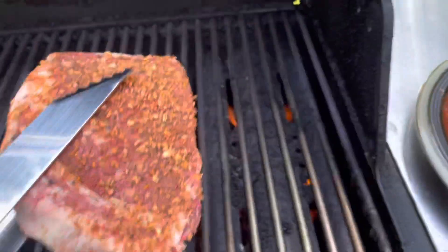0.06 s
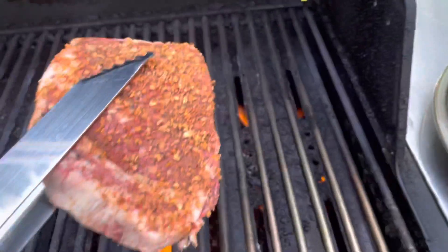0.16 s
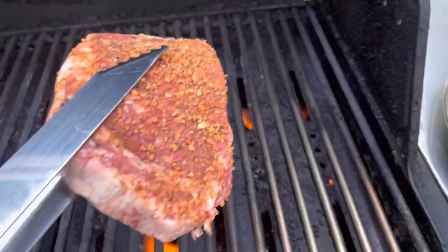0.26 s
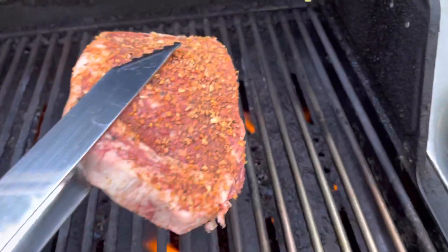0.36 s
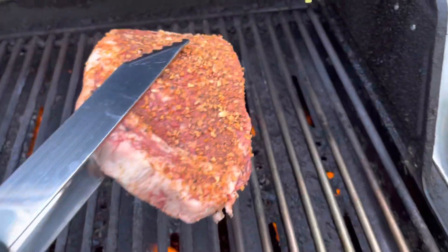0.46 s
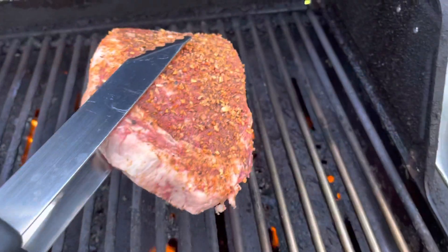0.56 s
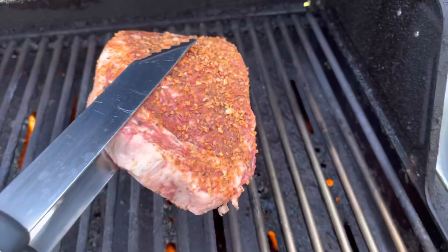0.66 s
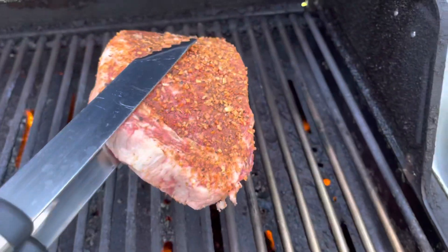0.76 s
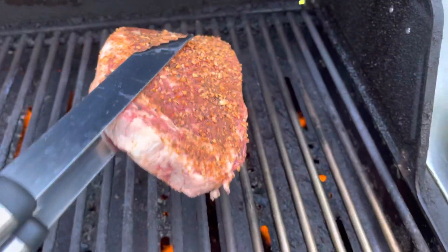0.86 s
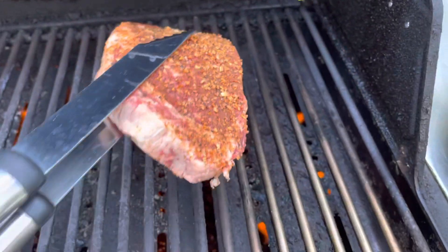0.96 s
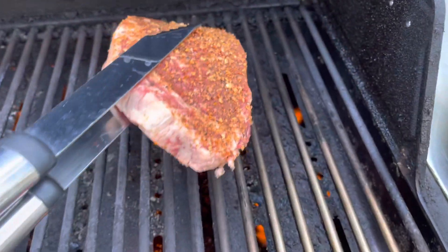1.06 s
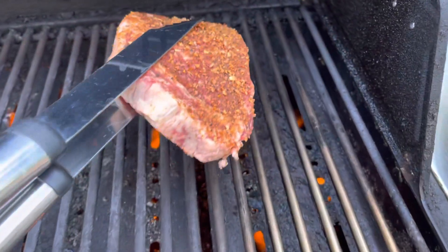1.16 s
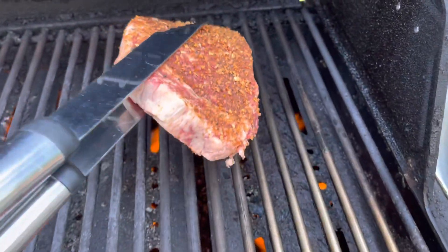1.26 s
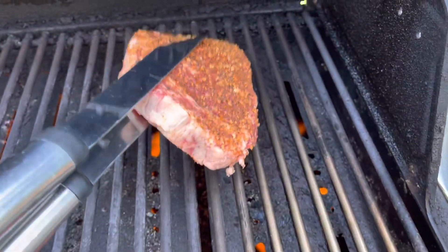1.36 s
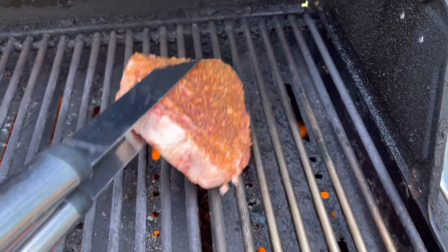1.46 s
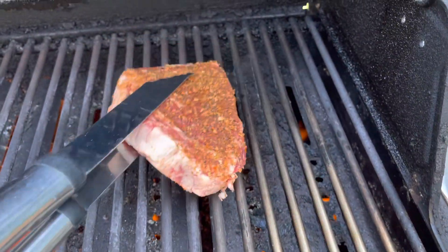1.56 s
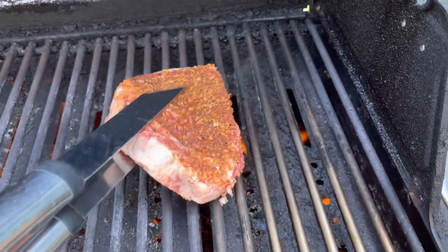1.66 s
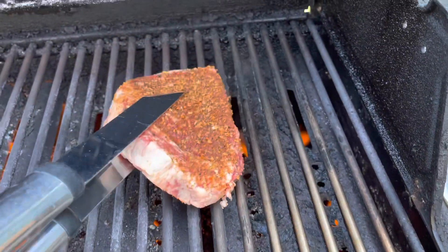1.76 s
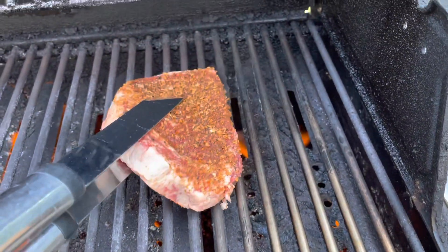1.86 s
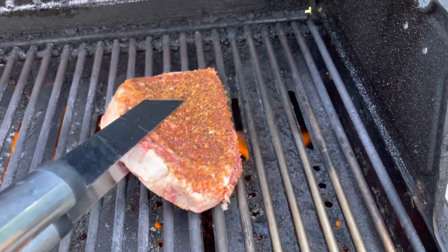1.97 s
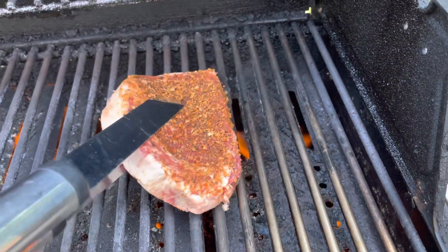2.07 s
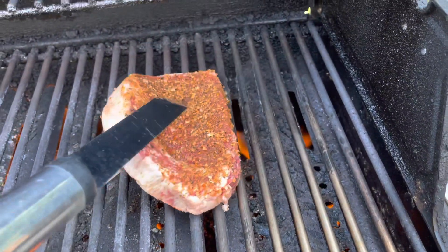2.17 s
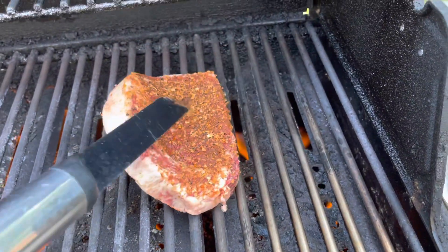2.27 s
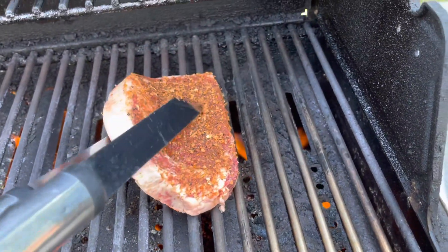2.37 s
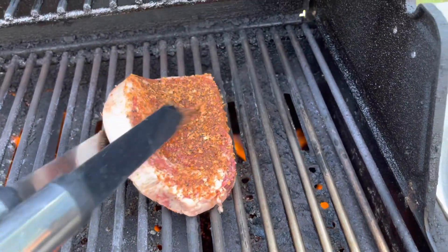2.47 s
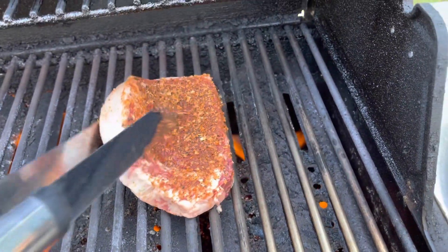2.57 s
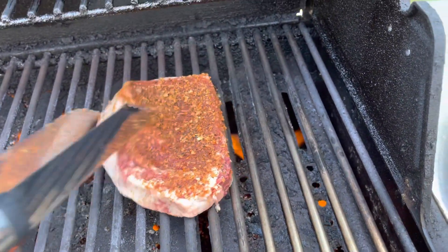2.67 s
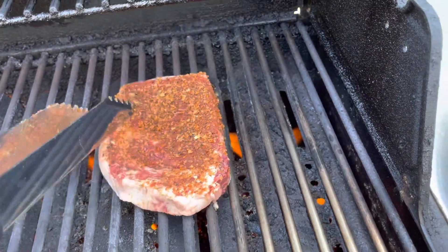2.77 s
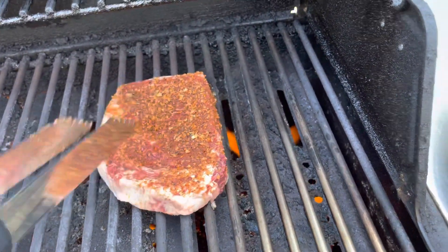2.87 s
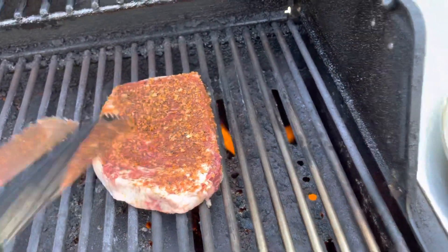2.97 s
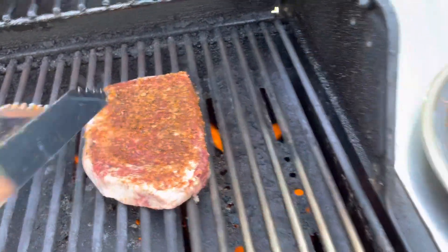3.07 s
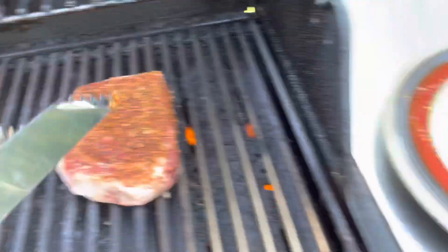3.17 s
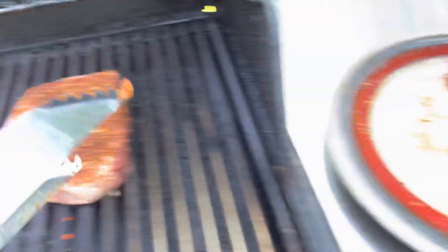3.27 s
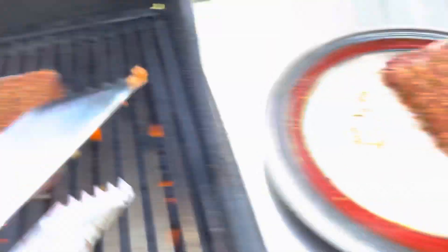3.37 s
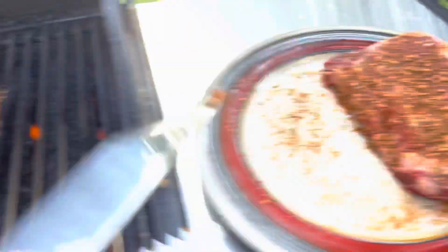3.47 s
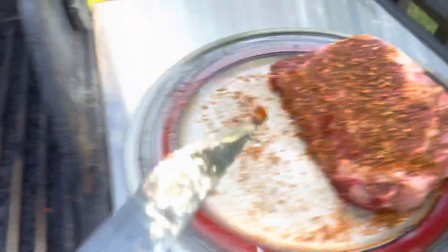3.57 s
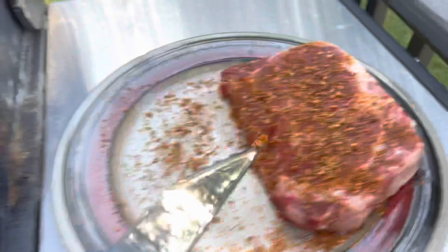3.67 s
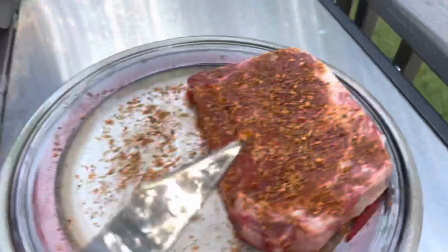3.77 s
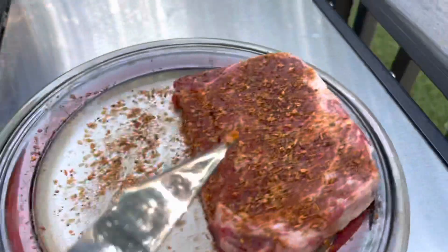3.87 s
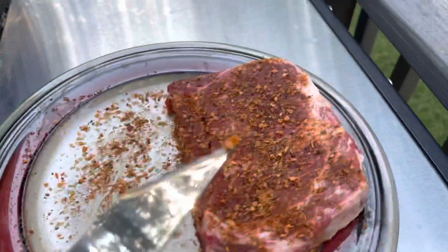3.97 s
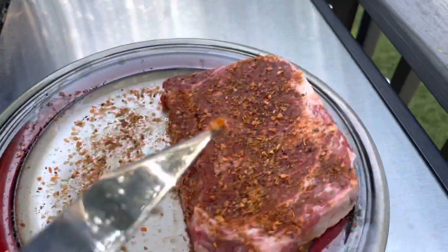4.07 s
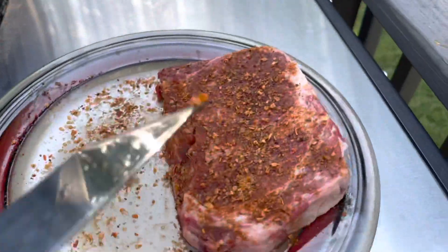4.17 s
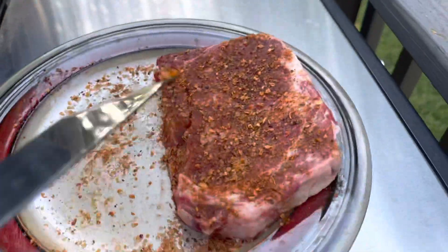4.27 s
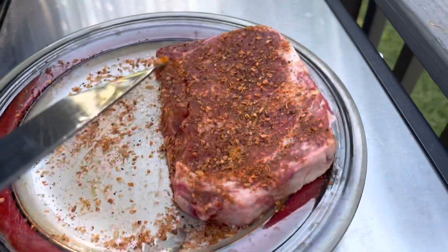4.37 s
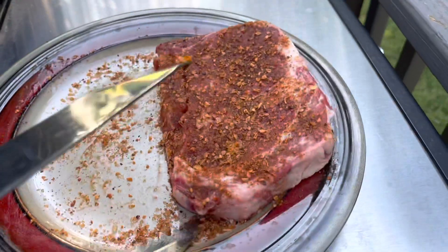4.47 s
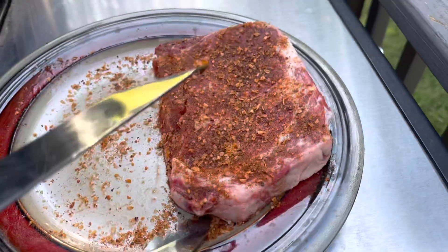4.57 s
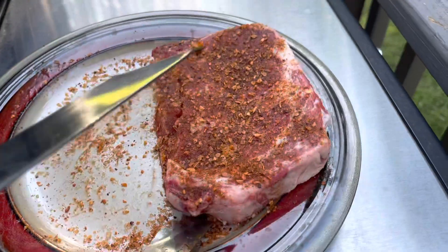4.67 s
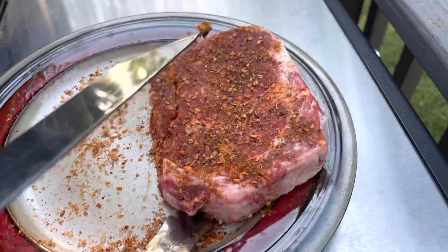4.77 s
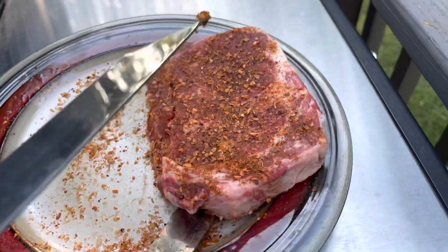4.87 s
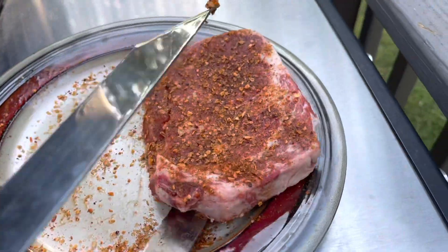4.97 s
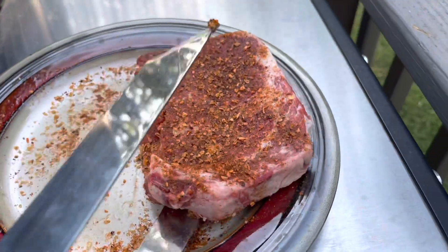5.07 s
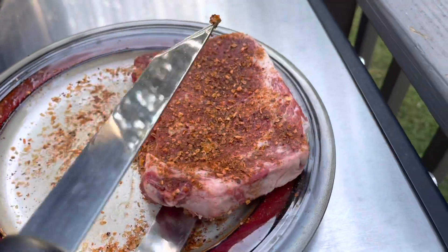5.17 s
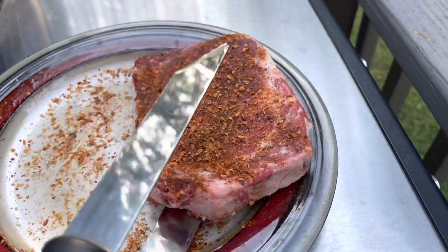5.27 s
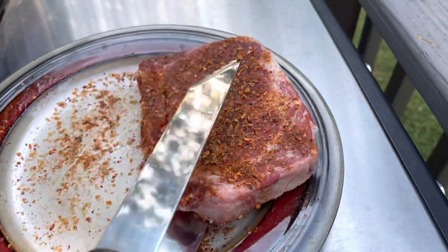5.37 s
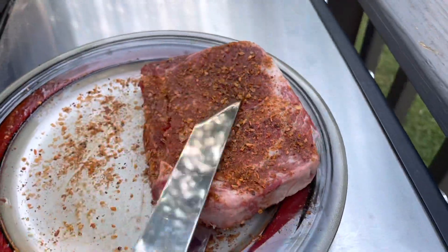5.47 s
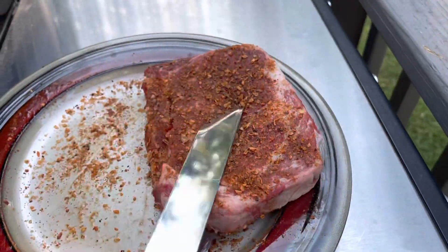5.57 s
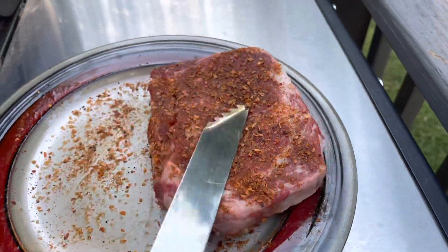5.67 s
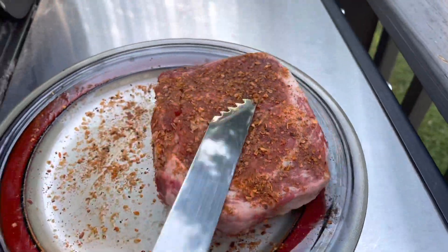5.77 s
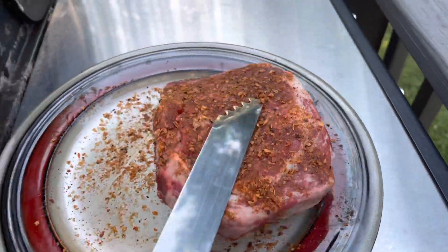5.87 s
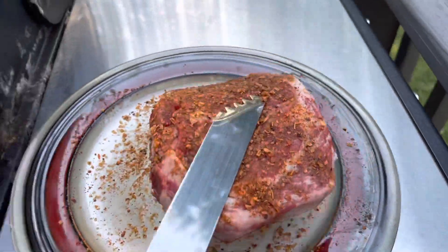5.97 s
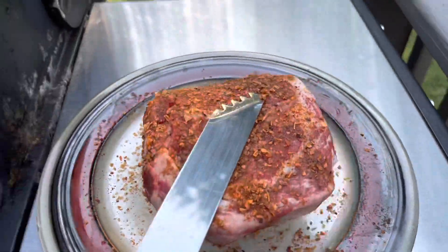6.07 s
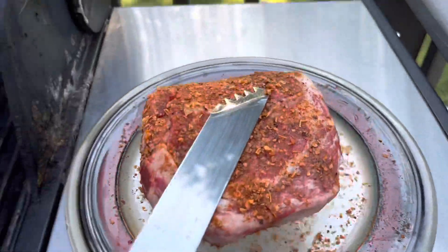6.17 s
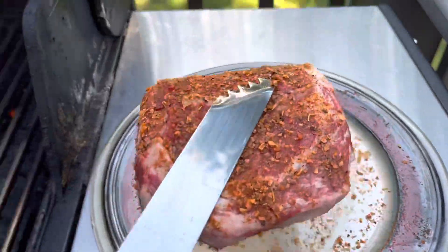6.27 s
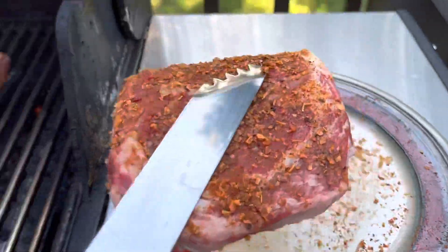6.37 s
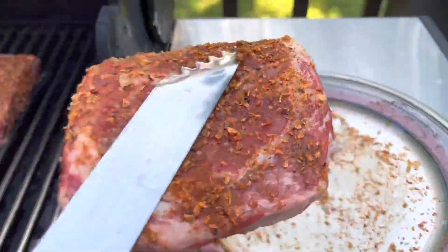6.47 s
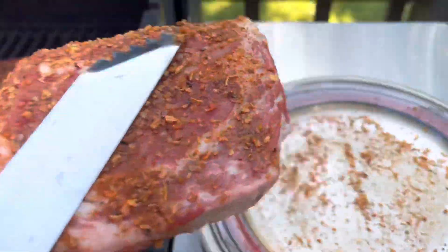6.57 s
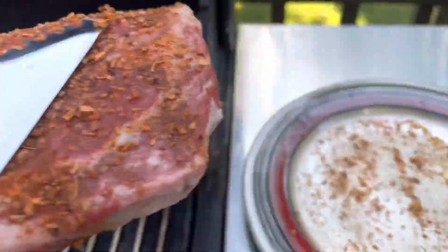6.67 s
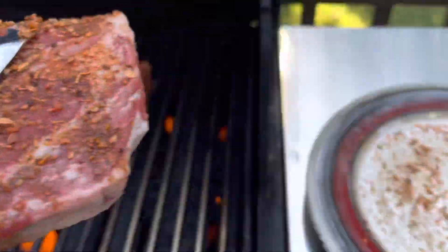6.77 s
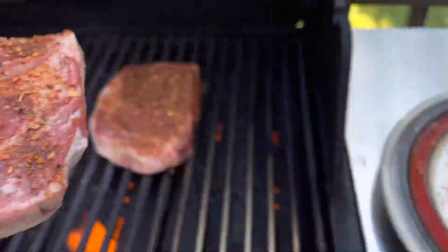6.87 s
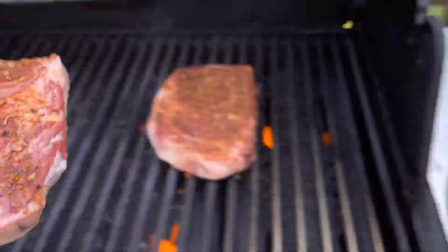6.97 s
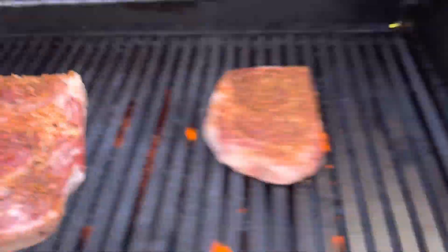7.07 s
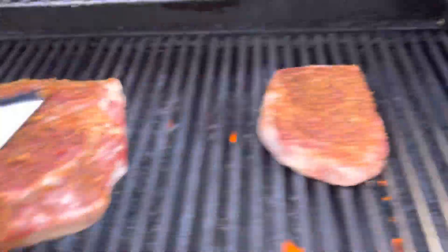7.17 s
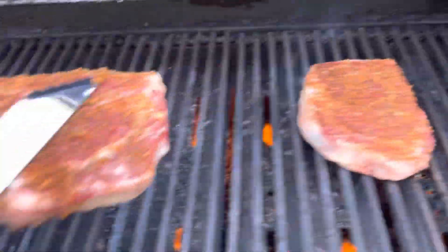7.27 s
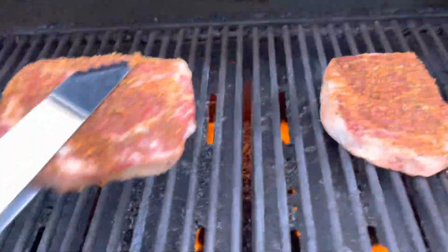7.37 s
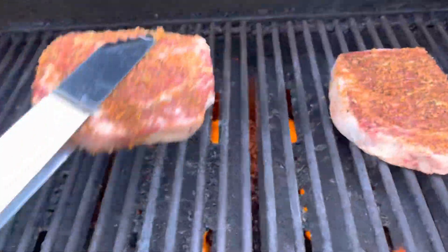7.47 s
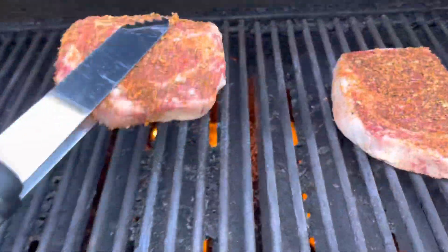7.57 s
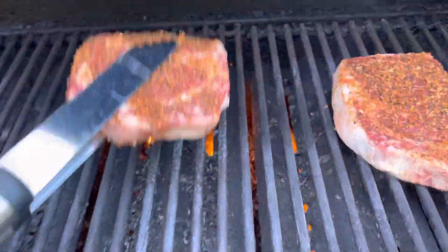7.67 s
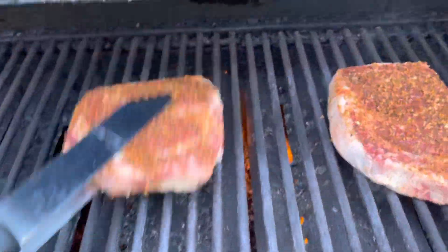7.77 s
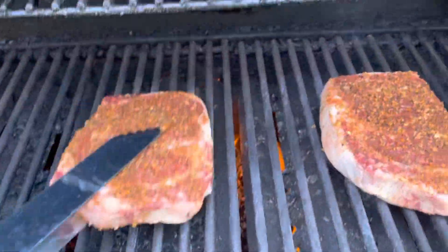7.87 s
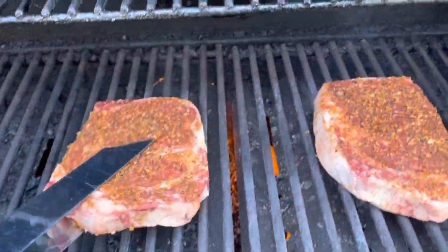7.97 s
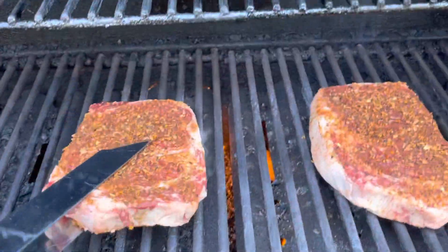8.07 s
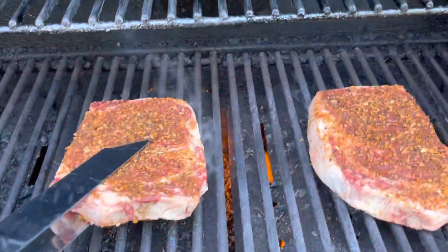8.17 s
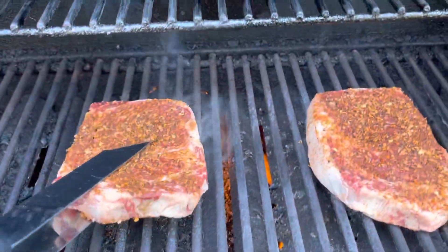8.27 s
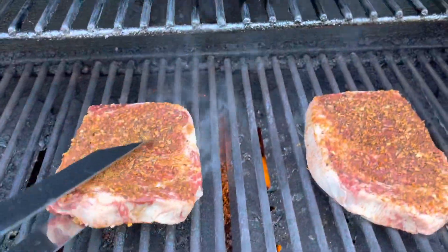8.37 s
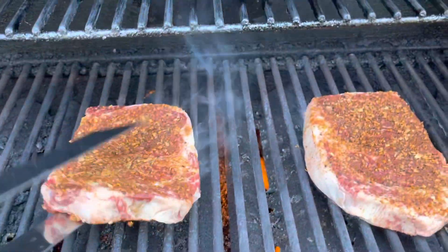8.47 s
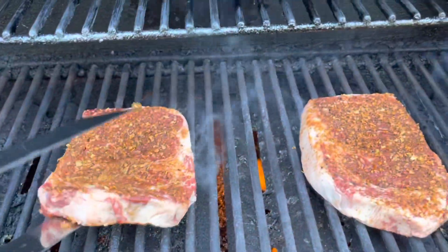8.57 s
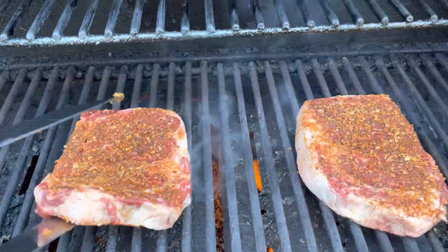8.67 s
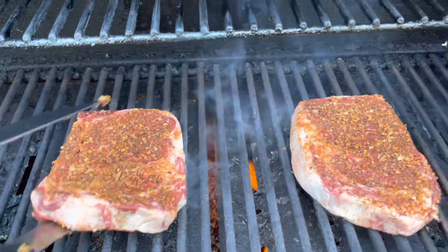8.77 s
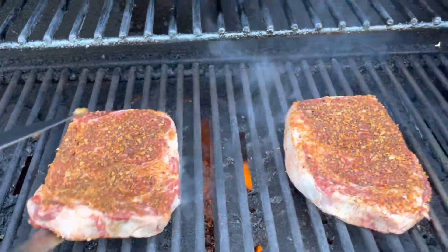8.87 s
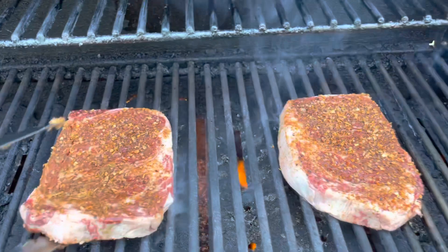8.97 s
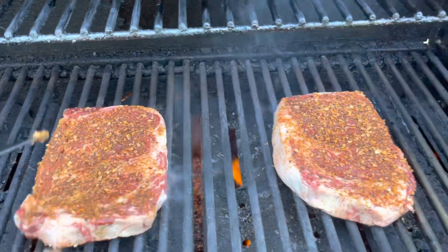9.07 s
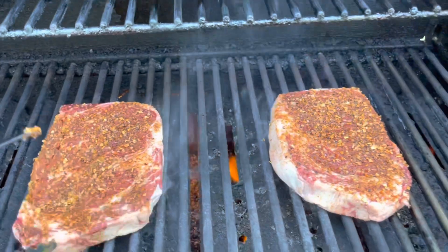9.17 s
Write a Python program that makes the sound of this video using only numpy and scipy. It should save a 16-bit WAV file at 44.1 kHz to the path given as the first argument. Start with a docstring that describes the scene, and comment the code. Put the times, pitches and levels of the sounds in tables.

```python
"""Fat and juice sizzle and spit as two steaks are laid on a gas grill outdoors, close to a phone's two ports:
bubbling bursts coloured as bright spit, duller frying and a low simmer, with loud pops of fat on top. Burners
roar as noise in the firebox's resonances, with an unsteady hum; garden air is a smooth hiss behind. Steel tongs
ring in their own tone and in the modes of a plate and the grate bars, and chatter along them; soft bumps thud
without a ring. Between the two steaks the phone turns away to the plate, which recolours the sizzle and lowers
the simmer."""
import sys
import numpy as np
from scipy import signal
from scipy.fft import rfft, irfft, next_fast_len
from scipy.io import wavfile
from scipy.ndimage import uniform_filter1d, map_coordinates

SR = 44100
rng = np.random.default_rng(int(sys.argv[2]) if len(sys.argv) > 2 else 0)


def wav_out(sig):
    """Save sig, one row per channel (or a flat mono array), as 16-bit PCM at SR to the path in sys.argv[1]."""
    wavfile.write(sys.argv[1], SR, np.round(np.clip(np.atleast_2d(sig).T, -1, 1) * 32767).astype(np.int16))


N = 407043

# the burners' roar: (time [s], level [dB])
ROAR_LEVEL = [(0, -37), (.4, -40), (3.0, -40.5), (3.6, -42.5), (5.5, -41.5), (6.5, -43.5), (7.2, -37),
              (7.7, -42.5), (8.1, -40.5), (9.23, -42.5)]
# resonances of the firebox: (centre [Hz], width [Hz], level [dB])
FIREBOX_RESONANCES = [(43, 4, -9), (55.8, 19, 1), (76.3, 5.5, 8), (94.5, 44, -5.5), (114.4, 17.8, 5.5),
                      (165.2, 42, -7), (216, 37, -17)]
# garden air behind the grill: (time [s], level [dB])
AIR_LEVEL = [(0, -53.5), (3.3, -54.5), (4.4, -53), (5.0, -55), (7.5, -58), (8.4, -53.5), (9.23, -54.5)]
# colour of the garden air: (frequency [Hz], level [dB])
AIR_COLOUR = [(120, -25), (250, -3), (500, -9), (1000, -13), (1400, -18), (2900, -21), (3500, -25),
              (5000, -25), (6500, -28), (8600, -26), (10200, -22), (11200, -27), (11700, -45), (12200, -90)]

# spitting as it reaches the phone, before its flutter: (time [s], level [dB])
SPIT_LEVEL = [(1.44, -34), (1.66, -31.5), (2.2, -26.5), (2.94, -26), (3.43, -26), (3.74, -29),
              (4.33, -31.5), (4.69, -31), (4.95, -35), (5.32, -32.5), (5.43, -34.5), (5.84, -33.5),
              (6.08, -30.5), (6.36, -29), (6.47, -33), (6.71, -33), (6.8, -31), (6.95, -31), (7.1, -32),
              (7.4, -33), (7.95, -29.5), (7.99, -26), (8.23, -25), (8.27, -29.5), (8.38, -27.5),
              (8.43, -25), (8.6, -27.5), (9.23, -27)]
# the phone's turn: (time [s], direction [0 facing the grill - 1 facing the plate])
PHONE_TURN = [(2.85, 0.31), (3.3, 0.68), (4.4, 1), (4.9, 1), (6.2, 0.98), (6.6, 0.64), (7.05, 0.11),
              (7.5, 0.32), (8.0, 0.4)]
# colour of the bright spitting: (frequency [Hz], level [dB])
SPIT_COLOUR = [(2000, -51.5), (4000, -25.5), (5300, -13.5), (6500, -10.5), (8000, -7), (9300, -2),
               (10500, 3), (11300, 0), (12200, -9), (13200, -12.5), (14300, -49), (15200, -18.5)]
# colour of the duller frying body: (frequency [Hz], level [dB])
FRYING_COLOUR = [(700, -34.5), (1400, -4), (2100, 6.5), (2500, 5.5), (3000, 7.5), (4000, 3), (5000, 3),
                 (8000, -15.5)]
# colour of the low simmer: (frequency [Hz], level [dB])
SIMMER_COLOUR = [(250, -13), (600, 0), (1200, 4), (1600, 4.5), (2500, -20)]
# added colour of spit and body before the juices run: (frequency [Hz], level [dB])
DRY_COLOUR = [(1500, 5), (2400, -4), (3000, 2), (3600, -10), (4500, -0.5), (6000, -1)]
# added colour of spit and body with the phone turned away: (frequency [Hz], level [dB])
TURNED_AWAY_COLOUR = [(1500, -1), (2050, 1), (2450, -1.5), (2800, -4.5), (3150, -6), (3600, 1), (4300, -1),
                      (5400, -3), (6100, 0), (6900, -4.5), (8000, 0.5), (11500, -3.5), (13000, -6.5)]
# loud pops of fat: (time [s], click level [dB], duller part against it [dB], bounce delay [ms],
# spray against the click [dB])
FAT_POPS = [(2.096, -24, -20, .7, -12), (4.6005, -21, -28, .7, -18), (4.8555, -21, -13, 0.66, -13),
            (5.3494, -20, -17, 0.63, -18), (5.4054, -28, -4, 0.53, -20), (6.267, -17, -29, .6, -16),
            (6.3654, -14, -15, 0.77, -23), (6.658, -29, -3, 0.82, -20), (6.9494, -28, -5, 0.62, -21),
            (7.486, -25, -13, 0.96, -16), (9.0174, -20, -7, 0.51, -23), (9.029, -19, -23, 0.98, -1.5),
            (9.101, -4, -23.5, 0.7, -14.5)]

# tongs on the grate: (time [s], ring level [dB], scrape [ms], weight in the modes under 350 Hz [dB],
# pitch that the contact point favours [Hz], its extra level [dB])
TONGS_ON_GRATE = [(2.111, -47, 5, -22.5, 1200, 21), (2.203, -43, 2.2, -30, 2160, -3),
                  (2.250, -54, 12, -26, 1200, 18), (2.400, -54, 12, -26, 1200, 21),
                  (8.433, -47, 3, -30, 1200, 14), (8.440, -45, 5, -30, 730, 18),
                  (8.515, -50, 3, -30, 1950, 6), (8.564, -41, 6.4, -23, 4350, 17),
                  (8.565, -48, 9, -19, 560, 22), (8.572, -48, 10, -30, 1050, 21),
                  (8.588, -49, 12, -30, 730, 21), (8.597, -46, 6, -30, 1950, 8),
                  (8.662, -48, 4, -18, 730, 18), (8.680, -48, 3.3, -30, 1950, 7),
                  (8.697, -40, 0.66, -32, 1500, 11), (8.726, -35.5, .9, -14, 2060, 2),
                  (8.762, -48, 3, -18, 560, 14)]
# tongs on the plate: (time [s], ring level [dB], scrape [ms], weight in the modes under 350 Hz [dB],
# pitch that the contact point favours [Hz], its extra level [dB])
TONGS_ON_PLATE = [(3.543, -41, 1.5, -38, 2965, -3), (3.637, -34.5, 3.9, -16, 495, 9),
                  (3.67, -51, 10, -20, 540, 19), (3.765, -42, 20, -32, 1200, 19),
                  (3.80, -51, 12, -25, 495, 18), (3.865, -49, 10, -20, 540, 17),
                  (3.775, -41, 37, -30, 2965, 5.5), (3.910, -39, 5.2, -35, 540, 8),
                  (4.083, -32, 2.4, -25, 2073, 13), (4.086, -44.5, 3.4, -11, 495, 19),
                  (4.182, -50, 6, -20, 533, 21), (4.192, -35.5, 12, -20, 2965, 8),
                  (4.208, -41, 4.7, -22, 2965, 15), (4.238, -44, 6, -23, 2965, 5),
                  (4.290, -45, 1.5, -35, 3900, 2), (4.4165, -26, 2.2, -9, 2965, 4),
                  (4.436, -52, 10, -3, 495, 21), (6.073, -54, 2, -20, 3900, 0),
                  (6.363, -47, 1.7, -15, 2073, 13)]
# ringing modes of the grate, with the tongs' own ring near 1200 Hz: (frequency [Hz], level [dB], free 60 dB
# decay [s])
GRATE_MODES = [(302, 1, .08), (564, 6.5, 0.071), (724, 7, 0.037), (1060, -8, 0.045), (1190, -2, 0.069),
               (1530, -2, 0.026), (1960, -4, .03), (2085, 0.5, .018), (2645, -9, 0.018), (3080, -1, .02),
               (4140, -8, .02), (4400, -7, .025), (5450, 0, .025)]
# ringing modes of the plate, with the tongs' own ring at 1200 Hz: (frequency [Hz], level [dB], free 60 dB decay
# [s])
PLATE_MODES = [(190, -4, .12), (280, -1, .18), (370, -7, .15), (460, -1, .13), (530, -1, .13),
               (620, -8, .1), (970, -9, .04), (1200, -10, .05), (1490, -5, .035), (2080, -10, .03),
               (2960, -1, .042), (3900, -7, .035), (4560, -13, .02), (5000, -9, .025), (5500, -10, .015),
               (6400, -10, .02), (9300, -8, .015)]
# colour of the crack of a contact: (frequency [Hz], level [dB])
CRACK_COLOUR = [(150, -38), (600, -16), (1100, -8), (1600, 0), (3000, 10), (6000, 9), (10000, 14),
                (13000, -33)]

# meat or tongs set down without a ring: (time [s], level [dB], pitch [Hz], 60 dB decay [s],
# snap strength against it [dB])
SOFT_BUMPS = [(6.137, -43, 600, .012, 2), (6.501, -51, 900, .01, 0), (6.623, -47, 500, 0.018, -4),
              (6.658, -50, 1100, .008, 2), (6.905, -52, 600, .012, -2), (6.975, -50, 380, .02, -8),
              (7.032, -50, 400, .02, -5), (7.072, -50, 450, .02, -4), (7.152, -50, 780, .015, 6),
              (7.208, -52, 600, .015, 3), (7.566, -43.5, 326, 0.045, -8), (7.693, -49, 290, .04, -10),
              (7.811, -42, 550, 0.011, -8), (7.832, -42, 250, .04, -12)]
# colour of the dry edge of a bump: (frequency [Hz], level [dB])
SNAP_COLOUR = [(150, -25), (500, 11), (1200, -10), (2300, -6), (3200, -20), (6000, -47)]
# tongs dragged off the bars, before the flicker: (time [s], level [dB])
RATTLE_LEVEL = [(8.40, -75), (8.44, -44), (8.47, -62), (8.54, -58), (8.575, -48), (8.62, -54), (8.66, -58),
                (8.73, -48), (8.77, -57), (8.81, -75)]
# colour of that chatter: (frequency [Hz], level [dB])
RATTLE_COLOUR = [(200, -25), (400, -6), (700, 2), (1200, 2), (2000, 2), (3500, -12), (5000, -12),
                 (7000, -35)]
# the two microphone ports: (frequency [Hz], likeness [0-1], left over right [dB], lead of right [rad])
MIC_PORTS = [(60, .97, .4, -.15), (300, .85, .2, -.3), (500, .6, .8, -.5), (700, .4, 3, -.7),
             (1300, .3, 4.5, -.2), (1900, .5, 1, .7), (2900, .7, 2, -.5), (4000, .88, 1, -.2),
             (5200, .62, 5, -.5), (6200, .88, .6, -.1), (7100, .55, 3, -.4), (8100, .9, .6, -.5),
             (8600, .96, 0, 0), (10250, .995, 0, 3.14), (11900, .96, 0, 6.28), (12600, .95, 0, 6.3),
             (13400, .98, 0, 9.4), (14300, .98, 0, 9.5), (15000, .99, 0, 12.56)]

HUM_HZ, HUM_WANDERS_HZ = 54.46, 4
HUM_DB, HUM_FLICKERS_DB = -7, 2  # hum amplitude against the roar's rms
TOUCH_S, CATCH_S = 1.421, 0.042  # the meat touches down; the sizzle takes this long to catch
FULL_DB = -28  # spit level at which body and simmer stand at their own levels
BODY_DB, BODY_FOLLOWS = -46.5, 0.86  # level once juicy; dB per dB of spit
SIMMER_DB, SIMMER_FOLLOWS, SIMMER_AWAY_DB = -50.5, 0.92, -12  # the same; change when turned away
JUICE_S, DRY_DB = 0.76, -4  # the juices take this long to run; change of body and simmer before then
BODY_LAG_S = 0.35  # the body evens out changes quicker than this
LOW_DB, LOW_FOLLOWS = -13.5, 0.1  # modes from 350 to 900 Hz; dB per dB of weight
MIDDLE_DB = -8  # modes from 900 to 1700 Hz
UPPER_DB, PLATE_CRACK_DB, GRATE_CRACK_DB = 2.5, 6, 8  # modes from 3300 Hz and cracks, for a 1 ms contact
UPPER_SOFTENS_DB, CRACK_SOFTENS_DB = 0.5, 3  # lost each time the scrape doubles in length
PLATE_LAG_S = 0.0049  # modes under 900 Hz speak this late, as the plate rocks onto the shelf
BLUR = 0.02  # a held object's modes smear over this share of their pitch
SNAP_T60_S = 0.02
BLOW_SPREAD = 0.33  # share of a blow that differs between the ports
TOP_HZ = 15900  # band limit of the microphone


def amp(db):
    """Amplitude of a level in dB."""
    return 10 ** (np.asarray(db) / 20)


def unit(x):
    """x scaled to an rms of one."""
    return x / np.sqrt(np.mean(x ** 2) + 1e-20)


def along(points, hz):
    """Each column after the frequency, read on a log axis."""
    f, *columns = np.transpose(points)
    return [np.interp(np.log(hz + 1), np.log(f + 1), column) for column in columns]


def curves(rows):
    """One value per sample for each column after the time."""
    s, *columns = np.transpose(rows)
    return [np.interp(np.arange(N) / SR, s, column) for column in columns]


def wobble(rate):
    """A smooth random curve, rate knots a second."""
    knots = rng.standard_normal(int(N * rate / SR) + 4)
    return map_coordinates(knots, [np.arange(N) * rate / SR])


def filtered(x, response):
    """x shaped by a complex response of frequency."""
    m = next_fast_len(N + SR // 2, real=True)
    return irfft(rfft(x, m) * response(np.fft.rfftfreq(m, 1 / SR)), m)[..., :N]


def colour(points):
    """Zero-phase response with the given colour."""
    return lambda hz: amp(along(points, hz)[0])


def causal(points):
    """Minimum-phase response with the given colour, so that clicks start sharply."""
    def response(hz):
        cepstrum = irfft(np.log(colour(points)(hz)))
        half = len(cepstrum) // 2
        cepstrum[1:half] *= 2
        cepstrum[half + 1:] = 0
        return np.exp(rfft(cepstrum))
    return response


def bursts(rate, spread_db, hiss):
    """A pair of streams of bursting steam bubbles of scattered size, over a power share of plain hiss."""
    size_db = spread_db * np.clip(rng.standard_normal((2, N)), -2, 2)
    size = amp(size_db) * rng.standard_normal((2, N))
    clicks = unit(size * (rng.random((2, N)) < rate / SR))
    return np.sqrt(1 - hiss) * clicks + np.sqrt(hiss) * rng.standard_normal((2, N))


def patchy(pair, depth_db):
    """Random gain patches over time and frequency, the same on both streams."""
    z = signal.stft(pair, nperseg=512)[2]
    field = uniform_filter1d(rng.standard_normal(z.shape[1:]), size=8, axis=0)
    field = uniform_filter1d(field, size=10, axis=1)
    return signal.istft(z * amp(depth_db * unit(field)), nperseg=512)[1][:, :N]


def burner_roar():
    """Flame noise booms in the firebox's resonances, with a low hum of unsteady pitch and level."""
    def firebox(hz):
        power = sum((amp(db) / (1 + (2 * (hz - centre) / width) ** 2)) ** 2
                    for centre, width, db in FIREBOX_RESONANCES)
        return np.sqrt(power) / (1 + (36 / (hz + 1)) ** 6)  # little below 36 Hz
    roar_db, = curves(ROAR_LEVEL)
    roar = unit(filtered(rng.standard_normal((2, N)), firebox))
    hum = np.sin(2 * np.pi * np.cumsum(HUM_HZ + HUM_WANDERS_HZ * wobble(11)) / SR)
    roar[0] += amp(HUM_DB + HUM_FLICKERS_DB * wobble(3)) * hum  # only in the shared stream
    return amp(roar_db + 0.09 * wobble(2.46)) * roar


def garden_air():
    """Distant open air is a smooth coloured hiss with faint random patches."""
    air_db, = curves(AIR_LEVEL)
    hiss = patchy(rng.standard_normal((2, N)), 1.6)
    return amp(air_db) * unit(filtered(hiss, colour(AIR_COLOUR)))


def sizzle():
    """From touchdown, steam bubbles spit brightly at the grate over a duller frying body and a low simmer."""
    (spit_db,), (away,) = curves(SPIT_LEVEL), curves(PHONE_TURN)
    since_touch = np.arange(N) / SR - TOUCH_S
    touching = np.clip(since_touch / CATCH_S, 0, 1) ** 1.16
    dryness = np.sqrt(np.clip(1 - since_touch / JUICE_S, 0, 1))
    even_db = uniform_filter1d(spit_db, size=round(BODY_LAG_S * SR))
    body_db = BODY_DB + DRY_DB * dryness + BODY_FOLLOWS * (even_db - FULL_DB)
    simmer_db = SIMMER_DB + DRY_DB * dryness + SIMMER_FOLLOWS * (spit_db - FULL_DB)
    simmer_db = simmer_db + SIMMER_AWAY_DB * away

    bubbles = bursts(3000, spread_db=4, hiss=0.78)
    spit = unit(filtered(patchy(bubbles, 1.0), causal(SPIT_COLOUR)))
    frying = patchy(bursts(1500, spread_db=4.5, hiss=0.76), 0.91)
    body = unit(filtered(frying, causal(FRYING_COLOUR)))
    simmer = unit(filtered(frying, causal(SIMMER_COLOUR)))

    flutter = wobble(13)  # shared by spit and body
    spit = amp(spit_db + 0.55 * flutter + 0.24 * wobble(30)) * spit
    body = amp(body_db + 0.5 * flutter + 0.48 * wobble(4.95)) * body
    simmer = amp(simmer_db + 0.6 * wobble(8) + 0.8 * wobble(3)) * simmer

    facing = spit + body
    facing = (1 - dryness) * facing + dryness * filtered(facing, colour(DRY_COLOUR))
    turned = filtered(facing, colour(TURNED_AWAY_COLOUR))
    return touching * ((1 - away) * facing + away * turned + simmer)


def pops():
    """A pocket of fat bursts: a click, its bounce off the meat and a short spray, each bright and duller."""
    bright, dull = np.zeros(N + SR), np.zeros(N + SR)
    t = np.arange(SR // 50) / SR
    for s, db, dull_db, bounce_ms, spray_db in FAT_POPS:
        burst = amp(spray_db - 60 * t / 0.012) * rng.standard_normal(len(t))
        burst[0] += 1
        burst[round(bounce_ms * SR / 1000)] += 0.55
        start = round((s + 0.001) * SR)  # 1 ms after the listed time
        bright[start:][:len(t)] += amp(db) * burst
        dull[start:][:len(t)] += amp(db + dull_db) * burst

    def click_scaled(x, points):
        """Colour x so that a lone click keeps its peak."""
        click = filtered(signal.unit_impulse(N), causal(points))
        return filtered(x[:N], causal(points)) / abs(click).max()
    return click_scaled(bright, SPIT_COLOUR) + click_scaled(dull, FRYING_COLOUR)


def tong_knocks(hits, modes, crack_db, lag_s):
    """Each contact is a short rough scrape that rings the modes and is heard itself as a crack."""
    rings, cracks, t = np.zeros(N + SR), np.zeros(N + SR), np.arange(SR // 5) / SR
    hz, level_db, t60 = np.transpose(modes)[:, :, None]
    low = hz[:, 0] < 900
    for s, db, scrape_ms, weight_db, favoured_hz, extra_db in hits:
        scrape_ms = max(scrape_ms, 0.5)
        doublings = np.log2(scrape_ms)
        low_db = LOW_DB + LOW_FOLLOWS * weight_db
        upper_db = UPPER_DB - UPPER_SOFTENS_DB * doublings
        bands = [hz < 350, hz < 900, hz < 1700, hz < 3300]
        share_db = np.select(bands, [weight_db, low_db, MIDDLE_DB, 0], upper_db)
        share_db = share_db + extra_db * (abs(hz / favoured_hz - 1) < 0.08)
        scatter_db = rng.normal(0, 1.5, hz.shape)
        free = amp(level_db + share_db + scatter_db - 60 * t / t60)

        u = 1000 * t[:SR // 10] / scrape_ms  # time in scrape lengths
        scrape = 1.2 * u * np.exp(-1.5 * u) * rng.standard_normal(len(u))
        # the ring builds while the scrape lasts, but each mode keeps its energy
        driven = signal.fftconvolve(free, abs(scrape)[None], axes=1)[:, :len(t)]
        energy = np.linalg.norm(free, axis=1, keepdims=True)
        driven *= energy / np.linalg.norm(driven, axis=1, keepdims=True)
        # a wandering phase smears each mode
        drift = np.cumsum(rng.standard_normal(driven.shape), axis=1) * np.sqrt(2 * np.pi * BLUR * hz / SR)
        driven *= np.sin(2 * np.pi * (hz * t + rng.random(hz.shape)) + drift)

        rings[round(s * SR):][:len(t)] += amp(db) * driven[~low].sum(axis=0)
        rings[round((s + lag_s) * SR):][:len(t)] += amp(db) * driven[low].sum(axis=0)
        cracks[round(s * SR):][:len(u)] += amp(db + crack_db - CRACK_SOFTENS_DB * doublings) * scrape
    return rings[:N] + filtered(cracks[:N], causal(CRACK_COLOUR))


def bumps():
    """A soft push that dies within a few cycles, with a dry noisy snap at its start."""
    pushes, snaps, t = np.zeros(N + SR), np.zeros(N + SR), np.arange(SR // 10) / SR
    for s, db, hz, t60, snap_db in SOFT_BUMPS:
        push = 2 * (1 - np.exp(-t * hz * 4)) * np.sin(2 * np.pi * hz * t)
        pushes[round(s * SR):][:len(t)] += amp(db - 60 * t / t60) * push
        snap = amp(db + snap_db + 12 - 60 * t / SNAP_T60_S) * rng.standard_normal(len(t))
        snaps[round(s * SR):][:len(t)] += snap
    return pushes[:N] + filtered(snaps[:N], causal(SNAP_COLOUR))


def rattle():
    """The tongs chatter along the bars in small uneven contacts, heard as coloured clicks over hiss."""
    t = np.arange(N) / SR
    level_db, = curves(RATTLE_LEVEL)
    chatter = unit(filtered(bursts(400, spread_db=4, hiss=0.32)[0], causal(RATTLE_COLOUR)))
    dragging = (t > RATTLE_LEVEL[0][0]) * (t < RATTLE_LEVEL[-1][0])
    return amp(level_db + 2.5 * wobble(54)) * chatter * dragging


def scene():
    """Steady sources are a shared and a differing stream; blows come from one spot, a little to the left."""
    steady = burner_roar() + garden_air() + sizzle()
    blows = pops() + bumps() + rattle()
    blows = blows + tong_knocks(TONGS_ON_GRATE, GRATE_MODES, GRATE_CRACK_DB, lag_s=0)
    blows = blows + tong_knocks(TONGS_ON_PLATE, PLATE_MODES, PLATE_CRACK_DB, PLATE_LAG_S)
    streams = steady + np.array([blows, BLOW_SPREAD * blows])

    def likeness(hz):
        """Weights of the two streams that give the ports their likeness at each frequency."""
        angle = np.arccos(np.clip(along(MIC_PORTS, hz)[0], 0, 1)) / 2
        return np.array([np.cos(angle), np.sin(angle)])
    shared, differing = filtered(streams, likeness)
    return np.array([shared + differing, shared - differing])


def record(dry):
    """The ports differ in level and phase, opposing each other near 10 kHz; nothing passes the band limit."""
    def ports(hz):
        _, balance_db, lead = along(MIC_PORTS, hz)
        side = np.array([[1], [-1]])  # left, right
        return amp(side * balance_db / 2) * np.exp(-0.5j * side * lead) * (hz < TOP_HZ)
    return filtered(dry, ports)


dry = scene()
out = record(dry)
wav_out(out)
```